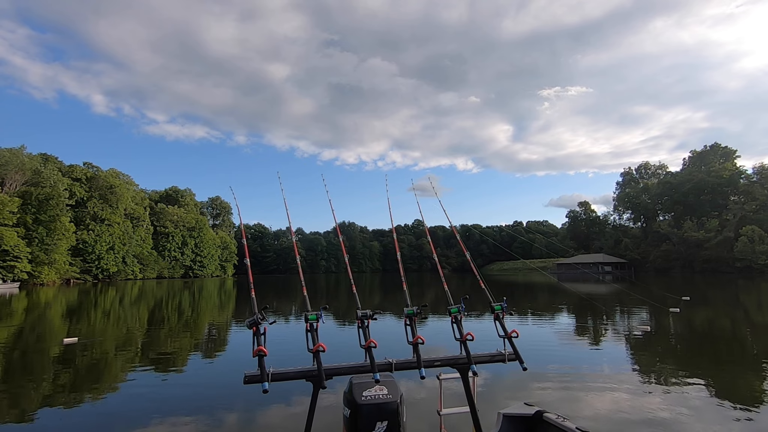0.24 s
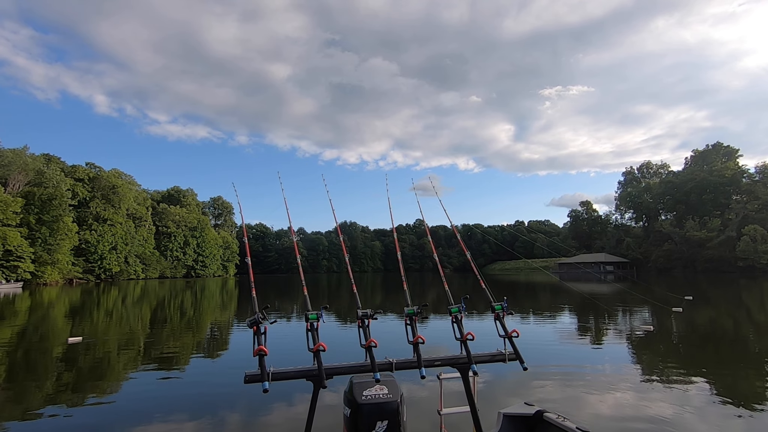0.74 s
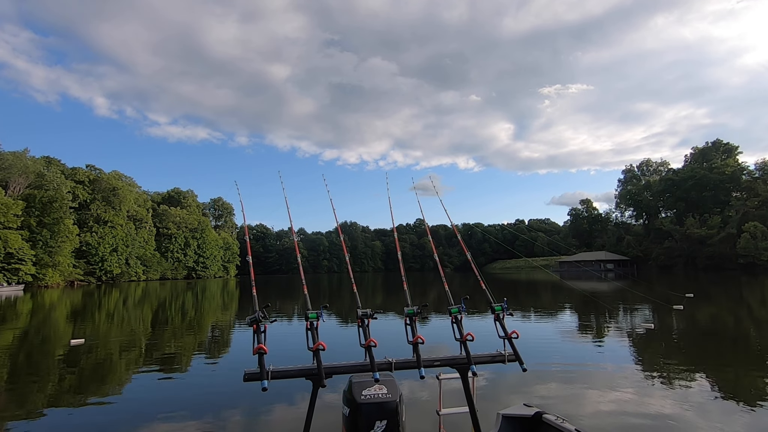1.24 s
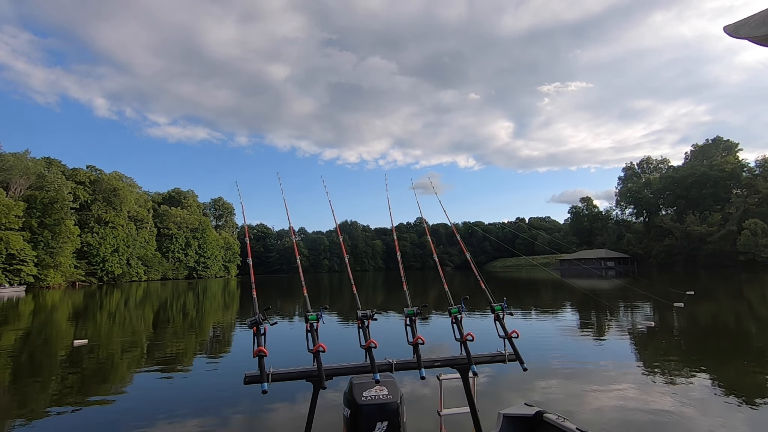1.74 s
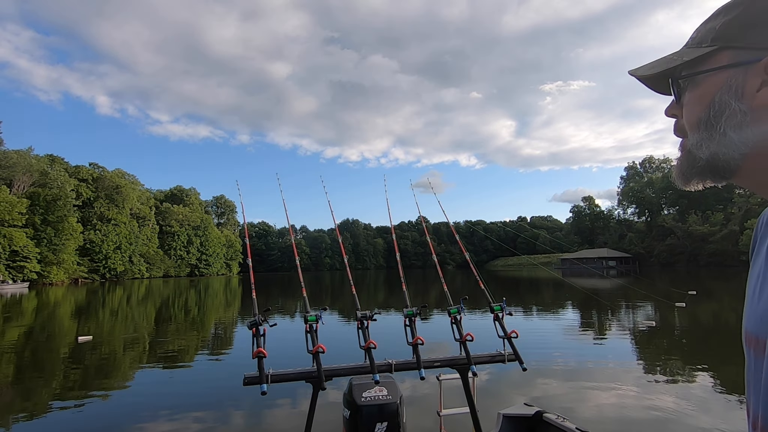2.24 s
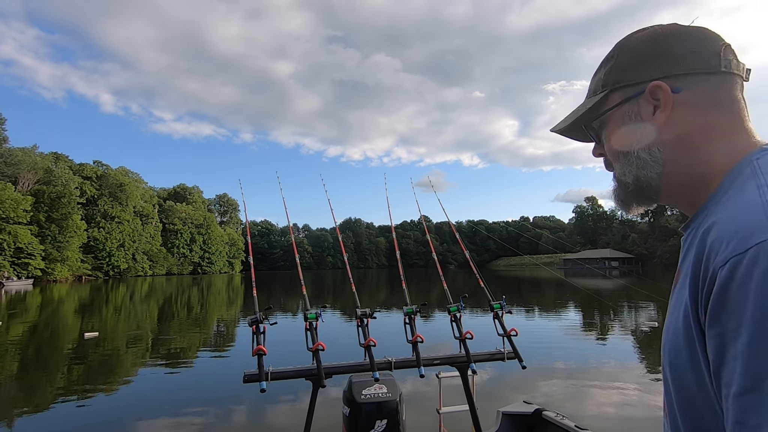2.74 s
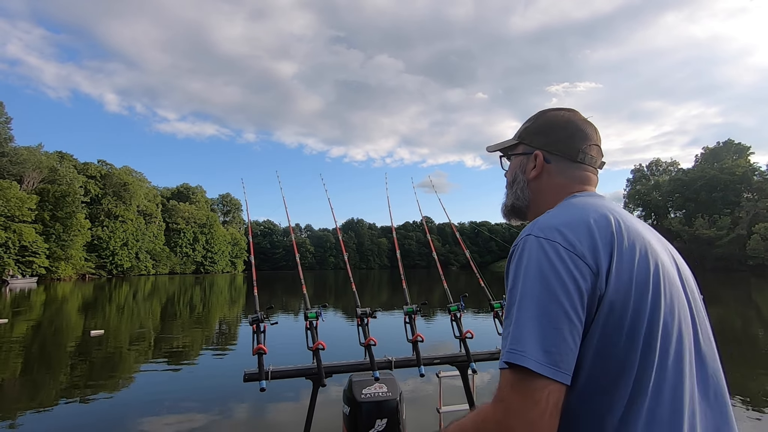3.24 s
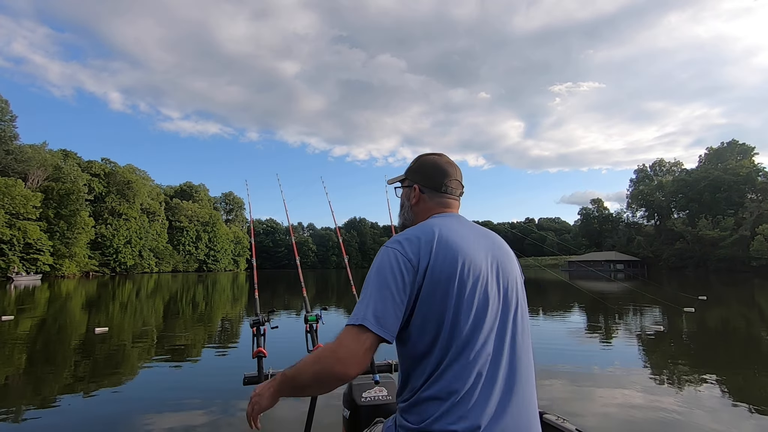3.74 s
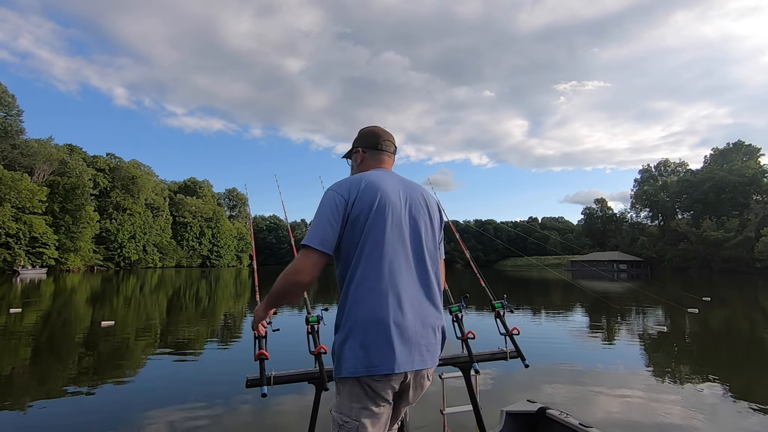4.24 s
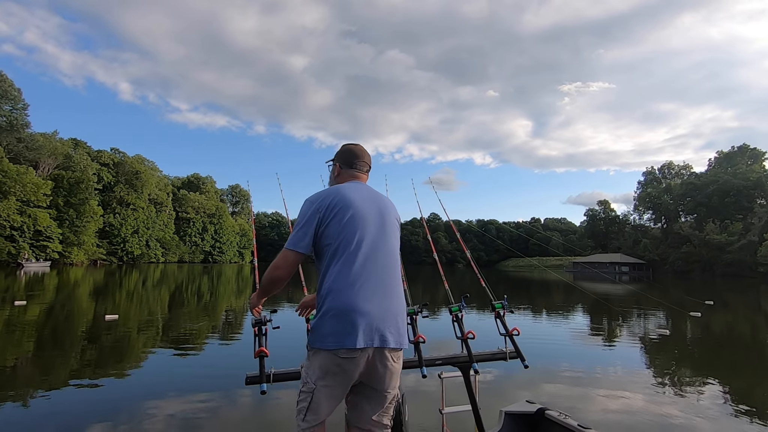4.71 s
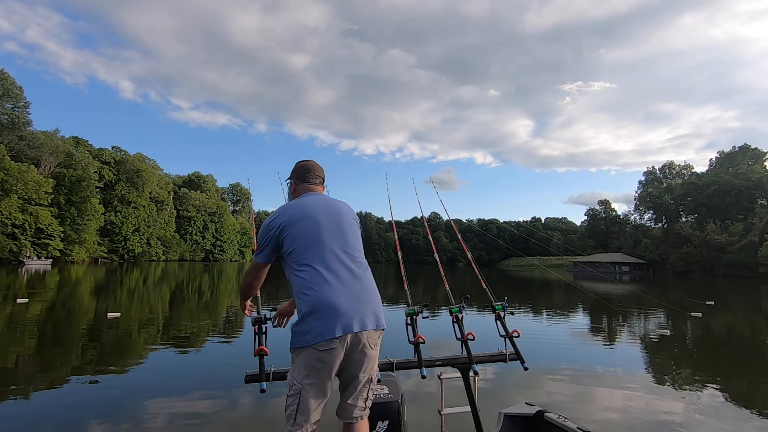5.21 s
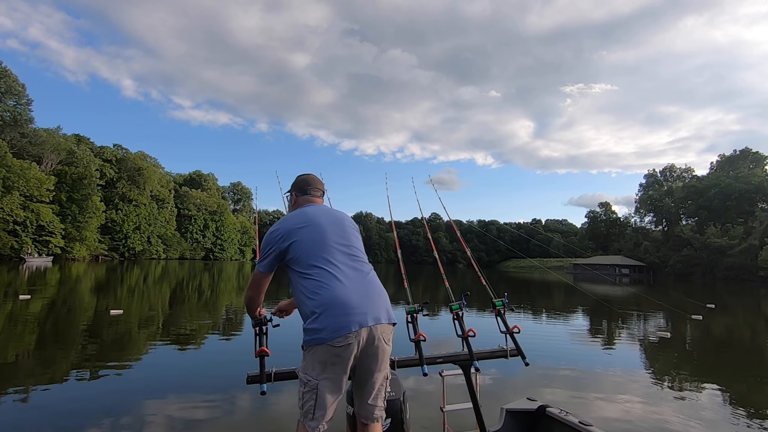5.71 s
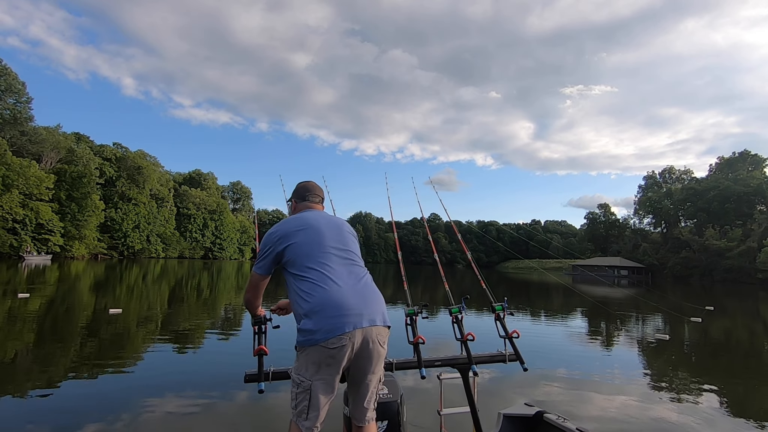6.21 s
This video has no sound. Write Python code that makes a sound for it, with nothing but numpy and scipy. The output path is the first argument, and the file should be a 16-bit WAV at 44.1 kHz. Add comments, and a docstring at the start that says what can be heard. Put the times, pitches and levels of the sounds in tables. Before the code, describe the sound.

A stereo microphone on the boat picks up close, hollow deck thumps, first strong on the right, then softer. Gear knocks and tiny metal parts clink while fabric scuffs. The movement shifts toward the center, a hard double knock with a metallic clang bursts out, and things calm to sparse thin reel ticks, ending on a quick slowing ratchet. Open lake air, a weak drone and steady insects lie underneath.

```python
"""Small boat on a calm lake: a person walks over the hollow deck and handles rods in a metal holder.
Steps and rolling weight ring the hull modes; gear knocks are grainy noise cracks with a short ring.
Soles and clothes rub as grainy noise, a sole squeaks in harmonics, metal parts clink as struck modes.
The reel ticks in noise bursts and its ratchet starts at the end; thin short tones glide.
Around it: filtered-noise hiss, a low resonant-noise drone and a steady noise band of insects."""
import sys
import numpy as np
from scipy import signal
from scipy.fft import rfft, irfft
from scipy.io import wavfile
from scipy.ndimage import uniform_filter1d

SR = 44100
rng = np.random.default_rng(int(sys.argv[2]) if len(sys.argv) > 2 else 0)


def wrap_up_sound(samples):
    """Save the sound to the file named by the first command line argument, as 16-bit audio."""
    columns = np.atleast_2d(samples).T
    # keep every value between -1 and 1, then stretch to whole-number steps
    tamed = np.clip(columns, -1, 1)
    steps = np.round(tamed * 32767).astype(np.int16)
    wavfile.write(sys.argv[1], SR, steps)


N = 284985


def amp(db):
    """dB to gain."""
    return 10 ** (np.asarray(db) / 20)


def rms_one(x):
    """Scale to rms 1."""
    return x / np.sqrt(np.mean(x ** 2) + 1e-20)


def in_time(rows, off=None):
    """Columns of a curve at every sample; off replaces the held end values."""
    s, *columns = np.transpose(rows)
    return [np.interp(np.arange(N) / SR, s, c, left=off, right=off) for c in columns]


def at_hz(points, hz):
    """Read a spectrum on a log-frequency axis."""
    points_hz, values = np.transpose(points)
    return np.interp(np.log(hz), np.log(points_hz), values)


def band(x, low_hz, high_hz):
    """Band-pass."""
    return signal.sosfilt(signal.butter(2, [low_hz, min(high_hz, .45 * SR)], "band", fs=SR, output="sos"), x)


def filtered(x, order, hz, kind="low"):
    """Butterworth low- or high-pass."""
    return signal.sosfilt(signal.butter(order, hz, kind, fs=SR, output="sos"), x)


def drift(rate_hz):
    """Slow random curve of rms 1: low-passed noise, computed at every 40th sample."""
    r = np.exp(-80 * np.pi * rate_hz / SR)
    noise = rng.standard_normal(N // 40 + 2002)
    slow = signal.lfilter([1], [1, -2 * r, r * r], noise)[2000:]
    return np.interp(np.arange(N) / 40, np.arange(len(slow)), rms_one(slow))


def ring(x, hz, t60_s):
    """Two-pole resonator: a unit click starts a decaying sine of height 1."""
    r, w = amp(-60 / (t60_s * SR)), 2 * np.pi * hz / SR
    return signal.lfilter([0, np.sin(w)], [1, -2 * r * np.cos(w), r * r], x + 1e-18)


def add(out, x, s):
    """Mix x into out from time s."""
    i = max(round(s * SR), 0)
    out[..., i:i + x.shape[-1]] += x[..., :N - i]


def panned(x, pan_db):
    """Two channels, pan_db apart left over right, whose mean gain stays 1."""
    sides = amp(np.reshape([pan_db / 2, -pan_db / 2], (2, -1)))
    return x * sides / np.cosh(pan_db * np.log(10) / 40)


def swells(starts, holds, rise_db_per_s, fall_db_per_s):
    """Rise up to each start, hold, fall; returns a function from peak dB to the power-summed envelope."""
    t = np.arange(0, N + 32, 32) / SR
    starts, ends = np.array(starts)[:, None], (np.array(starts) + holds)[:, None]
    before_db, after_db = (starts - t) * rise_db_per_s, (t - ends) * fall_db_per_s
    below_db = np.maximum(0, np.maximum(before_db, after_db))
    return lambda db: np.interp(np.arange(N) / SR, t, np.sqrt(amp(2 * db) @ amp(-2 * below_db)))


# person's path from the right to ahead: (time [s], left over right [dB])
BEARING = [(0, -9), (.6, -17), (1.2, -16), (2.2, -14.5), (3, -15.5), (3.4, -10), (3.8, -10.5), (4.3, -3),
           (4.9, -3), (5.7, -2), (6.46, 0.5)]


def bearing(s):
    """Left-over-right level [dB] of the person at time s."""
    return np.interp(s, *np.transpose(BEARING))


# likeness of the channels before alike_scale and alike_base: (frequency [Hz], likeness [0-1])
LIKENESS = [(30, 0), (100, 1), (300, 0.83), (1000, 0), (4000, 0.74), (12000, 0)]
# lean of the noise at lean_share 1: (frequency [Hz], left over right [dB])
LEAN = [(60, 2.0), (130, 0), (290, 1.5), (640, 1), (1410, -1.5), (3100, 0.5), (6820, -11.5), (15000, -2)]


def coloured(spectrum, alike_base, alike_scale, patchy_db, lean_share):
    """Third-octave bands of stereo noise, each with its level, flicker, likeness and lean; rms 1."""
    out, edges_hz = 0, 25 * 2 ** (np.arange(29) / 3)
    white = rng.standard_normal((2, 2, N))
    for k, (low, high) in enumerate(zip(edges_hz, edges_hz[1:])):
        # neighbouring bands draw on separate noises
        mid, side = band(white[k % 2], low, high)
        hz = np.sqrt(low * high)
        alike = np.clip(alike_base + alike_scale * at_hz(LIKENESS, hz), 0, 1)
        gain = amp(at_hz(spectrum, hz) + patchy_db * drift(13))
        pair = np.sqrt(1 + alike) * mid + np.sqrt(1 - alike) * side * [[1], [-1]]
        out = out + gain * panned(pair, lean_share * at_hz(LEAN, hz))
    return rms_one(out)


# spectrum of the open air: (frequency [Hz], relative density [dB per Hz])
AIR_SPECTRUM = [(25, -19), (52, -15), (82, -11.5), (198, 0.5), (313, -10), (567, -24), (800, -17),
                (1300, -28), (2900, -22.5), (3400, -26), (4750, -28.5), (6500, -33), (9000, -46.5),
                (12000, -45), (15500, -51)]
AIR_DB = -52


def open_air():
    """Hiss: broadband noise with slightly flickering bands."""
    return amp(AIR_DB) * coloured(AIR_SPECTRUM, alike_base=.05, alike_scale=0.83, patchy_db=1.2, lean_share=1)


# level of the low drone: (time [s], level [dB])
DRONE_LEVEL = [(0, -54), (2, -58), (4, -54.5), (5.4, -55), (5.8, -45), (6.46, -49)]
# resonances of the drone: (frequency [Hz], width [Hz], relative level [dB])
DRONE_PEAKS = [(137, 22, -5), (190.5, 32, 3), (258.5, 36, -2.5), (289, 23, -11), (380, 125, -7.5)]


def far_drone():
    """Noise-driven resonances with a slowly wavering level."""
    drone = sum(amp(db) * rms_one(ring(rng.standard_normal(N), hz, 2.3 / width_hz))
                for hz, width_hz, db in DRONE_PEAKS)
    return amp(in_time(DRONE_LEVEL)[0] + 1.4 * drift(1.4)) * rms_one(drone)


INSECTS_HZ, INSECTS_WIDTH_HZ, INSECTS_DB, INSECTS_PAN_DB = 4800, 800, -60, -5.5


def insects():
    """A chorus merged into one noise band, slowly wavering."""
    low_hz, high_hz = INSECTS_HZ - INSECTS_WIDTH_HZ / 2, INSECTS_HZ + INSECTS_WIDTH_HZ / 2
    chorus = rms_one(band(rng.standard_normal((2, N)), low_hz, high_hz))
    return amp(INSECTS_DB + 1.5 * drift(1.9)) * panned(chorus, INSECTS_PAN_DB)


# faint tones: (start [s], length [s], first pitch [Hz], last pitch [Hz], level [dB])
TONES = [(0.04, 0.11, 1276, 1290, -57), (0.135, .085, 3750, 3900, -63), (0.155, .065, 1260, 1280, -56),
         (0.25, .04, 3050, 2850, -58), (0.3, .06, 2800, 2720, -64), (0.79, 0.13, 950, 903, -53),
         (0.909, 0.19, 940, 885, -59), (0.953, 0.13, 786, 758, -57), (1.142, 0.17, 1206, 1260, -64.5),
         (4.02, 0.1, 7600, 7600, -74), (4.082, 0.08, 1906, 1920, -60), (4.521, 0.073, 1880, 1890, -58),
         (5.41, .05, 2250, 2000, -62), (5.5, .09, 3950, 3880, -70), (6.02, .1, 2200, 2130, -65),
         (6.17, .04, 2050, 2050, -58), (6.225, .04, 1700, 1680, -56), (6.26, .025, 1750, 1750, -60)]


def faint_tones():
    """Thin wavering sines that glide, swell and fade."""
    out, waver, flicker = np.zeros(N), 1 + 0.012 * drift(40), amp(2.5 * drift(25))
    for s, length_s, from_hz, to_hz, db in TONES:
        i, n = round(s * SR), round(length_s * SR)
        hz = np.linspace(from_hz, to_hz, n) * waver[i:i + n]
        phase = 2 * np.pi * np.cumsum(hz) / SR
        add(out, amp(db) * np.sqrt(2 * np.hanning(n)) * flicker[i:i + n] * np.sin(phase), s)
    return out * amp([[-3], [3]])


# strokes of soles and clothes: (start [s], hold [s], body level [dB], treble level [dB])
SCUFFS = [(0, 0.027, -55.5, -68), (0.073, 0.054, -54.5, -68), (0.162, 0.19, -61.5, -68.5),
          (.385, 0.1, -50.5, -67), (0.463, .15, -56, -70.5), (0.651, 0.042, -35.5, -58),
          (0.76, 0.091, -52, -73.5), (0.859, 0.032, -43.5, -66), (1.006, 0.13, -57, -76),
          (1.105, 0.046, -46, -63), (1.351, 0.032, -48, -78), (1.475, 0.14, -52.5, -73),
          (1.626, .04, -55.5, -70.5), (1.74, .03, -52.5, -65), (1.792, 0.044, -54, -65.5),
          (1.864, 0.027, -45, -65), (2.157, 0.057, -48.5, -62), (2.496, 0.023, -47.5, -74),
          (2.553, .04, -53, -74), (2.82, 0.078, -54, -66), (2.942, .02, -52, -67),
          (2.996, 0.026, -44.5, -60), (3.056, 0.067, -42.5, -58), (3.235, .02, -44.5, -56.5),
          (3.29, .03, -43, -57), (3.357, 0.049, -53, -63.5), (3.402, 0.055, -48.5, -62),
          (3.498, 0.018, -48, -59.5), (3.545, 0.064, -46, -62.5), (3.668, 0.036, -55, -66),
          (3.74, 0.09, -47.5, -63), (4.042, .02, -53, -75.5), (4.16, 0.018, -49.5, -82),
          (4.308, 0.027, -47, -65), (4.363, 0.15, -45.5, -65.5), (4.84, .05, -37, -54),
          (4.9, .06, -37, -56), (5.257, 0.05, -59, -68), (5.422, 0.048, -57.5, -85),
          (5.565, 0.1, -58.5, -82), (6.11, .04, -54, -74), (6.18, .1, -58, -76), (6.312, 0.13, -56, -61)]
# steady rustle of clothes: (time [s], body level [dB])
RUSTLE = [(0, -55), (1.6, -57.5), (2.1, -63.5), (4, -58), (4.7, -68.5), (5.4, -61), (6.3, -56.5)]
# spectrum of the rub: (frequency [Hz], relative density [dB per Hz])
RUB_SPECTRUM = [(300, -27), (450, -6.5), (800, -1), (1240, 0.5), (1960, 0), (2550, -7.5), (4000, -17.5),
                (5500, -13), (7300, -26), (9000, -20.5), (10500, -44), (13000, -58), (15500, -47)]
# tone of the rub's body: (time [s], gain below the split [dB], gain above it [dB])
RUB_TONE = [(0, -1.5, -5), (.6, 0.5, -11.5), (1.6, -3.5, -7.5), (2.1, -7, 1), (3.1, -6, 0.5),
            (3.7, 0.5, -1.5), (4.3, -12.5, -7), (4.9, 5.5, -5), (5.3, -10.5, 0), (6.46, -5, 0)]
SCUFF_RISE_DB_PER_S, SCUFF_FALL_DB_PER_S = 702, 371
RUB_SPLIT_HZ, RUSTLE_TREBLE_DB = 2740, -19.5
RUB_PAN_DB, RUB_PAN_SHARE = -0.5, 0.64
# treble of scuffs and knocks leans right and follows the bearing less
TREBLE_PAN_DB, TREBLE_PAN_SHARE = -5, .3


def scuff():
    """Rubbing: coloured noise broken into grains; each stroke has its own body and treble."""
    starts, holds, body_db, treble_db = np.transpose(SCUFFS)
    strokes = swells(starts, holds, SCUFF_RISE_DB_PER_S, SCUFF_FALL_DB_PER_S)
    rustle = amp(in_time(RUSTLE)[0] + 1.2 * drift(5.8))
    rub = coloured(RUB_SPECTRUM, alike_base=.55, alike_scale=.4, patchy_db=2.0, lean_share=0)
    rub = rub * amp(np.clip(2.6 * drift(70), -6, 4))
    # each part is levelled by a reference band
    body = filtered(rub, 2, 3500) / np.std(band(rub, 780, 2100))
    treble = filtered(rub, 5, 3400, "high") / np.std(band(rub, 7040, 8640))
    dull = filtered(body, 1, RUB_SPLIT_HZ)
    dull_db, thin_db = in_time(RUB_TONE)
    body = amp(dull_db) * dull + amp(thin_db) * (body - dull)
    body = np.hypot(strokes(body_db), rustle) * body
    treble = np.hypot(strokes(treble_db), amp(RUSTLE_TREBLE_DB) * rustle) * treble
    pan_db = bearing(np.arange(N) / SR)
    body = panned(body, RUB_PAN_DB + RUB_PAN_SHARE * pan_db)
    return body + panned(treble, TREBLE_PAN_DB + TREBLE_PAN_SHARE * pan_db)


# squeak of a sole: (time [s], pitch [Hz], level [dB])
SQUEAK = [(0.46, 475, -54), (0.464, 477, -59), (0.5, 438, -47), (0.53, 390, -48), (0.578, 400, -48),
          (0.61, 473.1, -64)]
# its harmonics: (multiple of the pitch, relative level [dB])
SQUEAK_PARTIALS = [(1, 0.5), (2, -2), (3, -21), (5, -21)]


def squeak():
    """Stick-slip of rubber: a gliding, slightly rough harmonic tone."""
    hz, _ = in_time(SQUEAK)
    _, level_db = in_time(SQUEAK, off=-120)
    phase = 2 * np.pi * np.cumsum(hz * (1 + 0.01 * drift(80))) / SR
    tone = sum(amp(db + 2 * drift(30)) * np.sin(k * phase) for k, db in SQUEAK_PARTIALS)
    return np.sqrt(2) * uniform_filter1d(amp(level_db), size=500) * tone * amp([[-3], [3]])


# thin ticks of the reel being turned: (time [s], peak level [dB])
TICKS = [(5.0867, -51), (5.1571, -58), (5.233, -43), (5.2638, -55), (5.2808, -52), (5.3931, -48),
         (5.4744, -55), (5.6744, -52), (5.695, -38), (5.9243, -61), (5.9558, -51), (5.975, -45),
         (6.0146, -48), (6.159, -47), (6.2032, -57), (6.2571, -45), (6.292, -47), (6.31, -34)]


def ticks():
    """Tiny bright noise bursts from the reel."""
    out, t = np.zeros(N), np.arange(SR // 20) / SR
    for (s, db), noise in zip(TICKS, rng.standard_normal((len(TICKS), len(t)))):
        burst = band(noise * amp(-60 * t / 0.04), 3300, 10700)
        add(out, amp(db) * burst / np.abs(burst).max(), s)
    return panned(out, pan_db=-10)


# reel ratchet: (time [s], click rate [1/s], drive level [dB])
RATCHET = [(6.319, 260, -58), (6.333, 180, -57), (6.36, 180, -55), (6.38, 210, -55), (6.4, 155, -54),
           (6.415, 115, -55), (6.428, 85, -53), (6.452, 70, -52), (6.47, 64, -54)]
# modes of its pawl: (frequency [Hz], relative level [dB], t60 [s])
PAWL = [(1700, -30, 0.014), (4800, 0, 0.005), (8950, -4, 0.005), (10000, -5, 0.0014), (12900, -13, 0.0027)]


def ratchet():
    """The pawl scrapes over each tooth as the spool turns: clicks and short noise bursts drive its modes."""
    per_s, _ = in_time(RATCHET, off=0)
    _, level_db = in_time(RATCHET, off=-120)
    teeth = np.diff(np.floor(np.cumsum(per_s) / SR), prepend=0)
    teeth = teeth * amp(level_db + rng.normal(0, 1.3, N))
    scrape = signal.lfilter([1], [1, -amp(-60 / (0.012 * SR))], teeth) * rng.standard_normal(N)
    drive = scrape + 7.0 * teeth
    return panned(sum(amp(db) * ring(drive, hz, t60_s) for hz, db, t60_s in PAWL), pan_db=-8.5)


def metal(strikes, modes, pan_db, waver_db):
    """Each strike hits every mode with a strength of its own; the ring wavers."""
    at, out = [round(s * SR) for s, db in strikes], np.zeros(N)
    luck_db = rng.normal(0, 1.5, (len(strikes), len(modes)))
    for k, (hz, level_db, t60_s) in enumerate(modes):
        clicks = np.zeros(N)
        clicks[at] = amp(np.array(strikes)[:, 1] + level_db + luck_db[:, k])
        out += ring(clicks, hz, t60_s) * amp(waver_db * drift(25))
    return out * amp([[pan_db / 2], [-pan_db / 2]])


# strikes on small loose metal parts: (time [s], level [dB])
CLINKS = [(3.11, -60), (3.233, -48), (3.288, -57), (3.345, -59), (3.403, -52), (3.454, -56), (3.51, -61),
          (3.57, -68)]
# modes of the parts: (frequency [Hz], relative level [dB], t60 [s])
TACKLE_MODES = [(5330, -5, .25), (5580, -12, .2), (9350, -5, .22), (10450, -5, .26), (12800, -12, .12),
                (13550, -9, .2), (14700, -13, .12)]


def jingle():
    """Small loose parts ring high; their swinging makes the ring waver."""
    return metal(CLINKS, TACKLE_MODES, pan_db=-10, waver_db=5)


# strikes on a metal fitting, at the heavy step and after: (time [s], level [dB])
CLANGS = [(4.937, -29), (5.088, -60)]
# modes of the fitting: (frequency [Hz], relative level [dB], t60 [s])
FITTING_MODES = [(1755, -14, .2), (1943, -14, .24), (2342, -5, .15), (2595, -4, .22), (2872, -11, .25),
                 (3058, -7, .2), (3300, -6, .08), (3905, -13, .3), (4420, -9, .1), (4840, -13, .2),
                 (5529, -3, .09), (5685, -9, .19), (6153, -2, .11), (7127, -8, .11), (7397, -13, .24),
                 (8463, -17, .2), (8624, -10, .09), (8737, -20, .17), (9087, -19, .28), (9755, -25, .17),
                 (10340, -18, .16)]


def clang():
    """A metal fitting rings in many dense modes."""
    return metal(CLANGS, FITTING_MODES, pan_db=-4, waver_db=1.5)


# hard knocks of gear: (time [s], low-band peak [dB], treble over low band [dB], ring [Hz],
# ring over low noise [dB], treble centre [Hz], t60 of the crack [s])
KNOCKS = [(0.085, -36.5, -14, 1650, 1, 5100, 0.044), (0.381, -30.5, -27, 810, -1, 3000, 0.063),
          (0.434, -43, -15, 829, 4, 4900, 0.051), (0.639, -18, 1.5, 1530, -13, 5770, 0.059),
          (0.656, -19, -6, 900, -12, 6800, 0.073), (0.67, -22, -22, 750, -2, 5000, 0.07),
          (0.856, -35, -12, 676, 3, 3300, 0.033), (1.108, -25.5, -12, 960, 7, 3800, 0.046),
          (1.109, -19, -6, 1340, 5, 4140, 0.045), (1.348, -30, -22, 1570, 1, 3100, 0.041),
          (1.462, -38, -5, 1500, -4, 4800, 0.056), (1.862, -40, 4, 1750, -4, 3100, 0.08),
          (2.187, -32, -7, 2010, -10, 3200, 0.043), (2.278, -37, -10, 1660, -2, 4900, 0.062),
          (2.5, -27, -32, 1900, 3, 3400, 0.032), (2.944, -28.5, 1, 1950, 2, 4500, 0.058),
          (3.014, -19.5, -26, 1750, 2.5, 3700, 0.039), (3.077, -29, -10, 2150, -13, 4400, 0.049),
          (3.109, -23, -9, 910, -10, 3800, 0.049), (3.23, -19.5, 8, 2460, -3, 5500, 0.055),
          (3.288, -19, 2.5, 1920, -6, 4280, 0.048), (3.368, -39, -3, 1900, -3, 4400, 0.052),
          (3.402, -26, 4.5, 1500, -10, 5300, 0.067), (3.454, -32, 3, 2110, 2, 6440, 0.078),
          (3.495, -35, -4, 2090, 0, 5700, 0.03), (3.51, -30, 3, 1450, -2, 5270, 0.036),
          (3.569, -22, -27, 2060, -7, 3000, 0.033), (3.684, -29.5, -25, 1430, 1, 3000, 0.041),
          (3.731, -34, 2, 1430, -10, 5300, 0.025), (3.748, -32.5, -5, 694, -3, 5900, 0.067),
          (3.827, -35, -16, 1440, 3, 3000, 0.033), (4.166, -41, -26, 1900, -7, 4600, 0.07),
          (4.297, -47, 5, 2550, 0, 3000, 0.08), (4.373, -32, -15, 2600, -3, 3000, 0.025),
          (4.39, -33.5, 0, 845, -2, 4400, 0.025), (4.435, -36, 2, 2030, 0, 5400, 0.036),
          (4.448, -28, -3, 2620, 4, 3000, 0.019), (4.498, -31, 5, 1900, -2, 4300, 0.028),
          (4.824, -33, 0, 2600, -3, 3000, 0.035), (4.835, -18, -14, 1930, -3, 4800, 0.032),
          (4.845, -23, -8, 790, -1, 3100, 0.073), (4.856, -18, -12, 754, 3, 3700, 0.034),
          (4.878, -31, -6, 2620, -4, 6500, 0.08), (4.882, -30, 5, 690, 5, 6550, 0.07),
          (4.889, -23.5, 8, 820, 2, 6540, 0.067), (4.901, -8, -13, 1910, 0, 6140, 0.03),
          (4.9055, -7, -18, 2120, -5, 3000, 0.022), (4.908, -11, -21, 735, 2, 3030, 0.059),
          (4.928, -20, -16, 714, 6, 3000, 0.052), (4.937, -20.5, 5, 2680, -1, 5800, 0.067),
          (4.941, -25, -3, 2900, -6, 5900, 0.039), (4.953, -32, -1, 2560, -3, 5800, 0.043),
          (5.015, -40, 3, 2000, -6, 3300, 0.065), (5.075, -42, -9, 2150, -1, 4300, 0.041),
          (5.446, -47, -13, 1900, 0, 4000, 0.058), (5.586, -45, -16, 795, 8, 4700, 0.08),
          (5.694, -30, 2.5, 2410, -1, 3300, 0.031), (5.889, -41, -26, 703, -1.5, 3200, 0.08),
          (5.967, -44, -1, 3000, 9, 3300, 0.027), (6.126, -40, -24, 1610, -11, 3000, 0.08),
          (6.304, -41, 2, 1500, -9, 3200, 0.089), (6.31, -33, 4, 1530, -2, 4870, 0.08),
          (6.316, -35, 4, 1650, -3, 8900, 0.088)]
KNOCK_RISE_SHARE, KNOCK_TAIL_DB, KNOCK_GRAIN_DB = 0.03, -19, 2.0   # rise as share of t60
LAG_S_PER_DB = 1.2e-5   # a source on the right reaches the left channel later


def knocks():
    """Each knock: a grainy dying crack in two bands, with one short ring of the part that is hit."""
    out, t = np.zeros((2, N)), np.arange(SR // 8) / SR
    noise = rng.standard_normal((len(KNOCKS), 3, len(t)))
    steps = rng.standard_normal((len(KNOCKS), len(t) // 40 + 1))
    grains = amp(KNOCK_GRAIN_DB * np.repeat(steps, 40, axis=1))
    for knock, (shared, left, right), grain in zip(KNOCKS, noise, grains):
        s, db, treble_db, hz, ring_db, treble_hz, t60_s = knock
        # sharp crack, weaker slower tail
        fall = amp(-60 * t / t60_s) + amp(KNOCK_TAIL_DB - 20 * t / t60_s)
        fall = fall * np.minimum(t / (KNOCK_RISE_SHARE * t60_s), 1) * grain[:len(t)]
        hit = (t == 0) + 0.11 * shared * fall ** 2
        low = rms_one(band(shared * fall, max(0.4 * hz, 400), 2840))
        low = low + amp(ring_db) * rms_one(ring(hit, hz, 0.6 * t60_s))
        crack = (shared + 0.82 * np.array([left, right])) * fall
        high = rms_one(band(crack, 3400, 6000))
        high = high + 1.55 * rms_one(band(crack, treble_hz / 1.31, treble_hz * 1.126))
        pan_db = bearing(s)
        low = panned(low / np.abs(low).max(), pan_db)
        high = panned(high / np.abs(high).max(), TREBLE_PAN_DB + TREBLE_PAN_SHARE * pan_db)
        both = amp(db) * (low + amp(treble_db) * high)
        add(out[0], both[0], s - LAG_S_PER_DB * pan_db)
        add(out[1], both[1], s)
    return out


# hull and deck modes: (frequency [Hz], relative level [dB], free t60 [s])
HULL_MODES = [(44.8, -5.5, 0.39), (63, -5.5, 0.49), (86.76, 0.5, 0.33), (117.6, 2, 0.28), (146.1, -4, 0.32),
              (179.2, -0.5, .2), (226, -2.5, 0.17), (258, -6, 0.19), (315.6, -6, 0.2), (366, -1, .2),
              (415, 2, 0.17), (520, 5, 0.14), (614, 4, 0.16), (735, 8, 0.12)]
# blows on the deck: (time [s], deep peak [dB], panel peak [dB], ring length [share of free t60],
# deep bounce [Hz], panel bounce [Hz])
THUMPS = [(0.386, -21.5, -27, 0.82, 64, 211), (0.44, -33.5, -36, 0.81, 68, 200),
          (0.499, -43, -48, 0.66, 60, 422), (0.64, -9, -6.5, 0.65, 115, 215), (0.656, -18, -7, 1, 100, 235),
          (0.688, -17, -10.5, 1, 76, 345), (0.717, -10.5, -19, 0.45, 112, 300),
          (0.855, -10.5, -17.5, 1, 88, 235), (0.9, -26.5, -27, 0.85, 97, 200),
          (0.923, -32, -31, 0.55, 111, 200), (1.105, -11, -17, 0.97, 88, 243),
          (1.148, -46, -24, 0.68, 84, 200), (1.343, -14.5, -23.5, 1, 84, 230),
          (1.4, -20, -28.5, 0.4, 79, 200), (1.485, -17, -31.5, 1, 83, 200),
          (1.55, -23.5, -32.5, 1, 61, 214), (1.799, -32.5, -34, 0.39, 108, 210),
          (1.871, -29.5, -29, 1, 110, 347), (2.148, -25.5, -44, 1, 74, 200),
          (2.208, -26.5, -47, 0.75, 92, 200), (2.806, -33, -43.5, 1, 69, 200),
          (2.96, -33.5, -37, 0.4, 49, 199), (3.014, -24, -45, 1, 69, 210),
          (3.104, -19, -28.5, 0.64, 79, 300), (3.496, -29, -44.5, 1, 67, 301),
          (3.576, -28, -34, 0.48, 56, 219), (3.734, -20.5, -30, 0.53, 60, 190),
          (3.76, -28, -33, 0.5, 80, 200), (3.775, -16, -30, 0.32, 84, 200),
          (3.797, -15.5, -21, 0.62, 135, 200), (3.815, -26, -26.5, 0.82, 46, 200),
          (3.839, -28, -37.5, 0.97, 68, 207), (4.299, -28.5, -38.5, 1, 74, 203),
          (4.378, -39, -52, 0.65, 43, 196), (4.53, -38, -42, 0.62, 41, 186),
          (4.835, -33, -17.5, 0.72, 139, 191), (4.855, -23, -9.5, 0.86, 60, 182),
          (4.87, -30.5, -15, 0.82, 60, 276), (4.901, -16.5, -6, 0.4, 92, 190),
          (4.909, -26, -11.5, 0.86, 95, 366), (4.926, -12, -14, 0.36, 88, 366),
          (4.94, -23, -14, 0.92, 60, 330), (4.958, -20.5, -17.5, 0.64, 88, 187)]
PANEL_HZ = 140   # modes above belong to the deck panels, below to the whole hull
GIVE_CYCLES, GIVE_SHARE = 7.5, 1.0   # cycles to -60 dB; bounce mixed in beside the modes


def steps_on_deck():
    """Soft blows: the deck under the foot bounces a few cycles and drives the hull or panel modes."""
    out, push = np.zeros(N), np.zeros(SR // 2)
    push[0] = 1
    soft = signal.lfilter(*signal.butter(2, 500, fs=SR), push)
    luck = rng.normal(0, 1, (len(THUMPS), len(HULL_MODES)))
    for (s, deep_db, panel_db, stretch, deep_hz, panel_hz), odd in zip(THUMPS, luck):
        for db, bounce_hz, deep in (deep_db, deep_hz, True), (panel_db, panel_hz, False):
            give = ring(soft, bounce_hz, GIVE_CYCLES / bounce_hz)
            boom = np.zeros(len(push))
            for (hz, level_db, t60_s), o in zip(HULL_MODES, odd):
                if (hz < PANEL_HZ) == deep:
                    mode = ring(give, hz * (1 + 0.012 * o), t60_s * stretch)
                    # modes above the bounce move against it
                    boom += amp(level_db + 1.5 * o) * mode * np.sign(bounce_hz - hz + 1)
            bounce = ring(give, bounce_hz, GIVE_CYCLES / bounce_hz)
            boom = boom / np.abs(boom).max() + GIVE_SHARE * bounce / np.abs(bounce).max()
            add(out, amp(db) * boom / np.abs(boom).max(), s)
    return out


# weight rolling over the deck: (start [s], hold [s], level [dB], brightness [dB per octave])
ROLLS = [(0, 0.2, -53.5, -4), (0.405, 0.061, -30.5, -6.5), (0.794, 0.068, -32, -0.5),
         (0.997, 0.12, -41.5, 3.5), (1.165, 0.098, -31.5, -9.5), (1.466, 0.042, -27, -7),
         (1.597, 0.088, -41.5, -6.5), (1.748, .2, -47.5, -1.5), (2.2, .15, -50, -9), (2.44, 0.16, -54, -10),
         (2.847, 0.065, -40.5, -9), (2.994, 0.12, -35.5, -9), (3.115, 0.04, -41, 2),
         (3.2, 0.29, -42.5, -2.5), (3.557, 0.19, -37.5, -5.5), (3.758, 0.05, -26, -4.5),
         (3.895, 0.085, -40.5, -16), (4.12, .1, -57, -10), (4.33, 0.23, -38.5, -9), (4.647, .15, -59, -2),
         (4.976, 0.06, -29, -3.5), (5.096, 0.14, -43.5, -8.5), (5.363, .12, -54, -14.5),
         (6.1, 0.42, -58, -13)]
ROLL_RISE_DB_PER_S, ROLL_FALL_DB_PER_S = 303, 155
ROLL_DULL_DB_PER_OCTAVE = 19   # slow weight hardly stirs the highest panel modes


def rolling_weight():
    """Noise drives the hull modes with shorter rings; each swell shares its power among them."""
    starts, holds, roll_db, tilt_db = np.transpose(ROLLS)
    weight = swells(starts, holds, ROLL_RISE_DB_PER_S, ROLL_FALL_DB_PER_S)
    shares_db = np.array([g - ROLL_DULL_DB_PER_OCTAVE * max(np.log2(hz / 280), 0) + tilt_db * np.log2(hz / 80)
                          for hz, g, t60_s in HULL_MODES])
    levels_db = roll_db + shares_db - 10 * np.log10(np.sum(amp(2 * shares_db), axis=0))
    rolls = [rms_one(ring(rng.standard_normal(N), hz, 0.24 * t60_s)) for hz, g, t60_s in HULL_MODES]
    return sum(weight(db) * roll for db, roll in zip(levels_db, rolls))


# out-of-step part of the hull between the channels: (frequency [Hz], level [dB])
HULL_SIDE = [(30, -13), (60, -21), (120, -35), (400, -12.5)]
SHAKE_DB, SHAKE_LOW_HZ, SHAKE_HIGH_HZ = -8, 22, 55.3


def hull():
    """Steps and rolling weight boom in the hull; a deep shake, opposite in the channels, follows them."""
    boom = steps_on_deck() + rolling_weight()
    force = np.sqrt(np.abs(uniform_filter1d(boom ** 2, size=2000)))
    shake = rms_one(band(rng.standard_normal(N), SHAKE_LOW_HZ, SHAKE_HIGH_HZ))
    shake = amp(SHAKE_DB) * force * shake
    hz = np.maximum(np.fft.rfftfreq(N, 1 / SR), 1)
    # quarter-cycle shift
    out_of_step = irfft(1j * rfft(boom) * amp(at_hz(HULL_SIDE, hz)), N)
    return boom + (out_of_step + shake) * np.array([[1], [-1]])


def scene():
    """Lake, gear and boat."""
    surroundings = open_air() + far_drone() + insects()
    person = scuff() + squeak()
    gear = ticks() + ratchet() + jingle() + clang() + knocks()
    return surroundings + faint_tones() + person + gear + hull()


SHADE_HZ, SHADE_DB, CUTOFF_HZ = 10720, -6, 15700


def record(dry):
    """The top treble is shaded, then cut off steeply."""
    below = signal.sosfilt(signal.cheby1(6, .5, SHADE_HZ, fs=SR, output="sos"), dry)
    above = filtered(dry, 4, SHADE_HZ, "high")
    shaded = below + amp(SHADE_DB) * above
    return signal.sosfilt(signal.cheby2(12, 40, CUTOFF_HZ, fs=SR, output="sos"), shaded)


dry = scene()
out = record(dry)
wrap_up_sound(out)
```